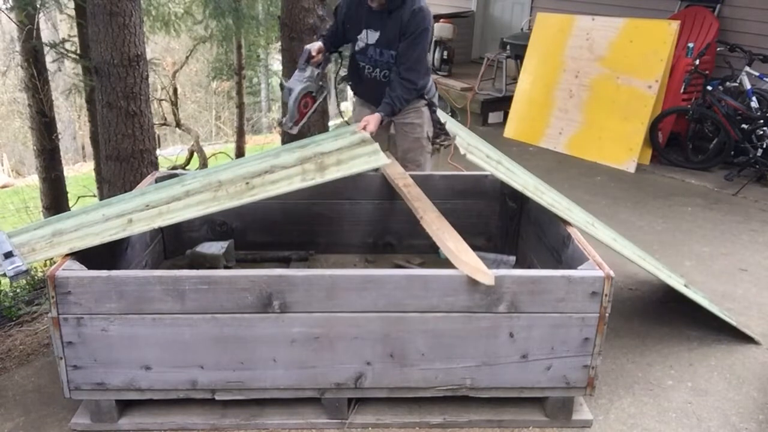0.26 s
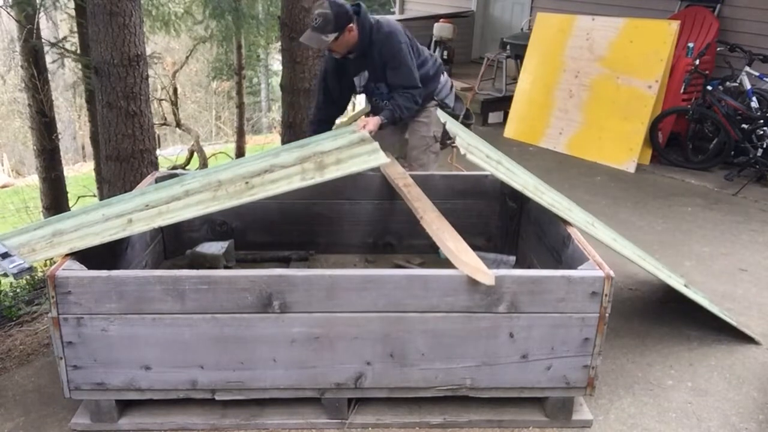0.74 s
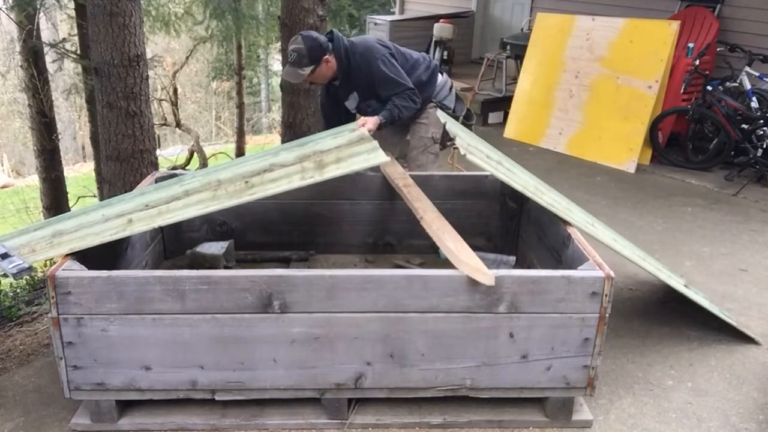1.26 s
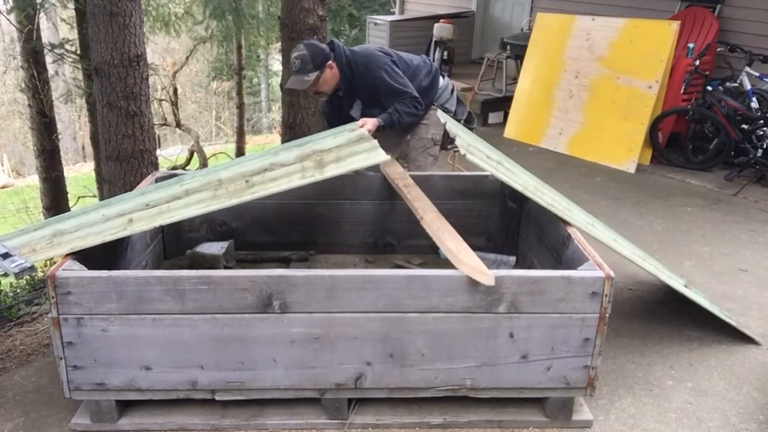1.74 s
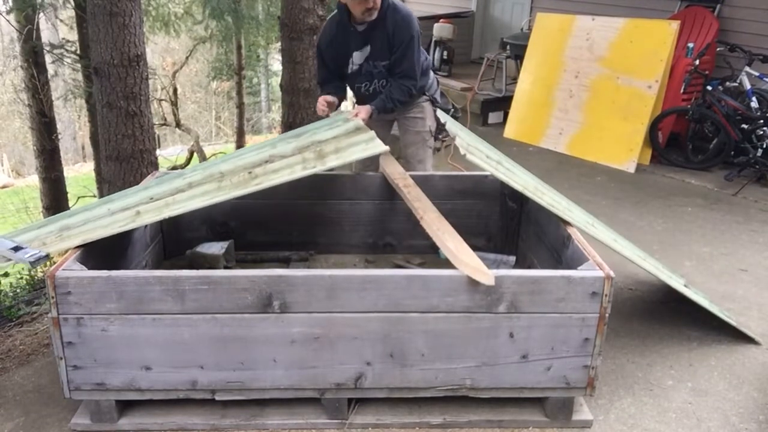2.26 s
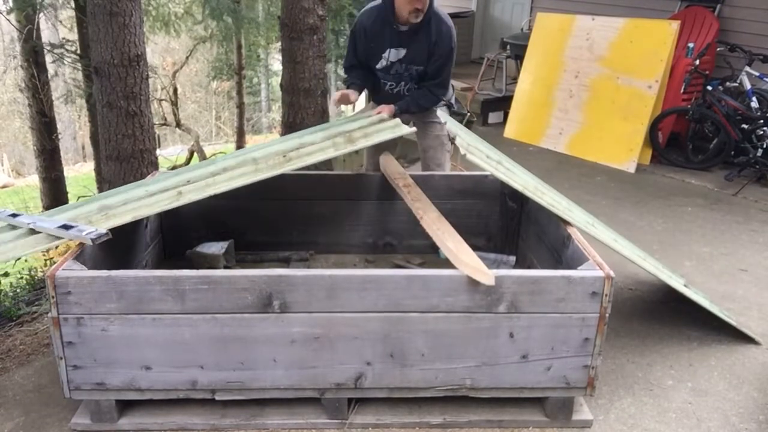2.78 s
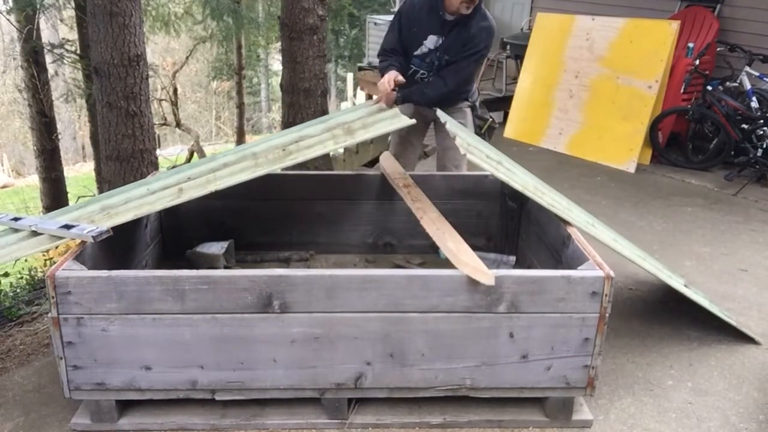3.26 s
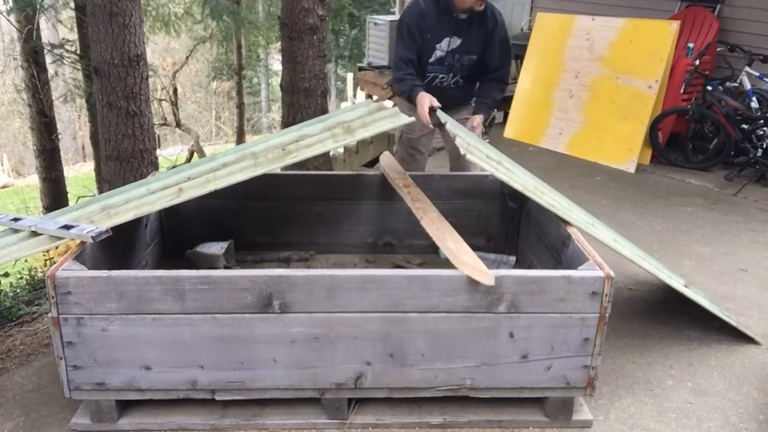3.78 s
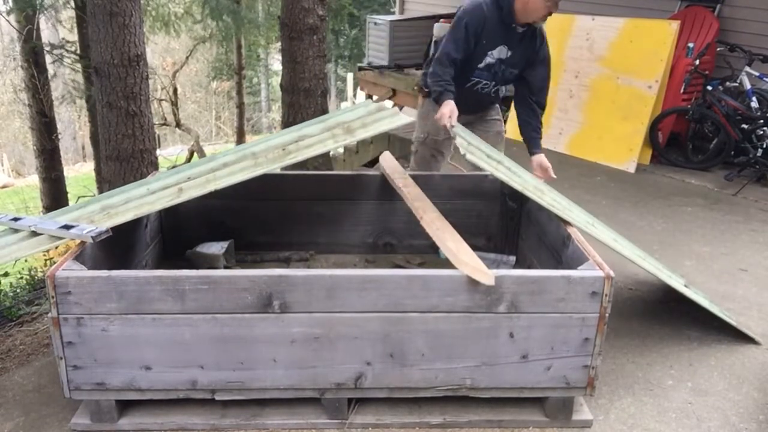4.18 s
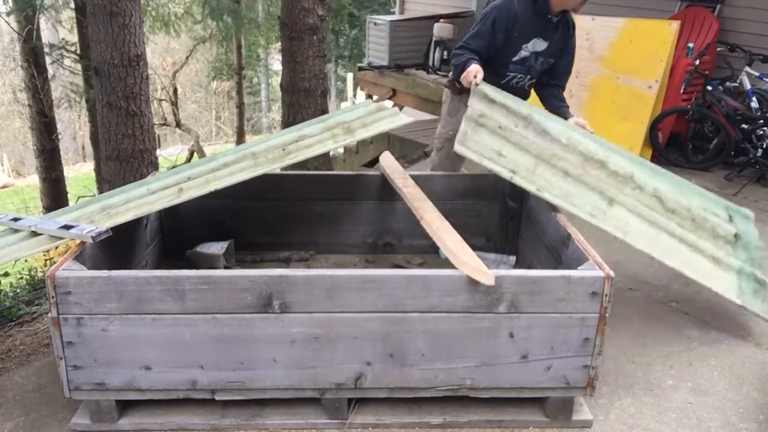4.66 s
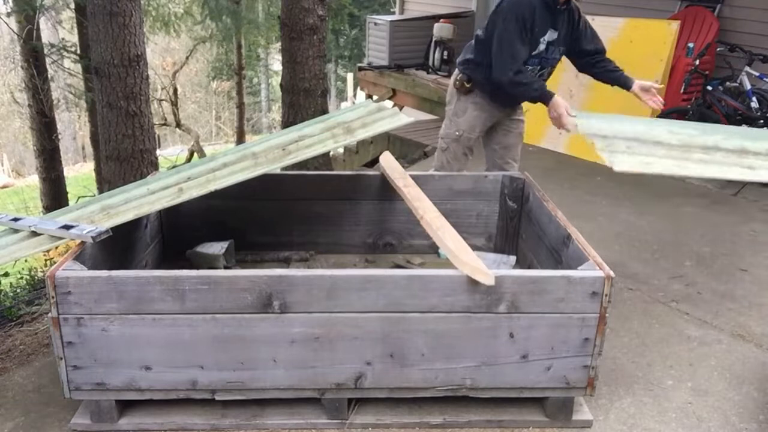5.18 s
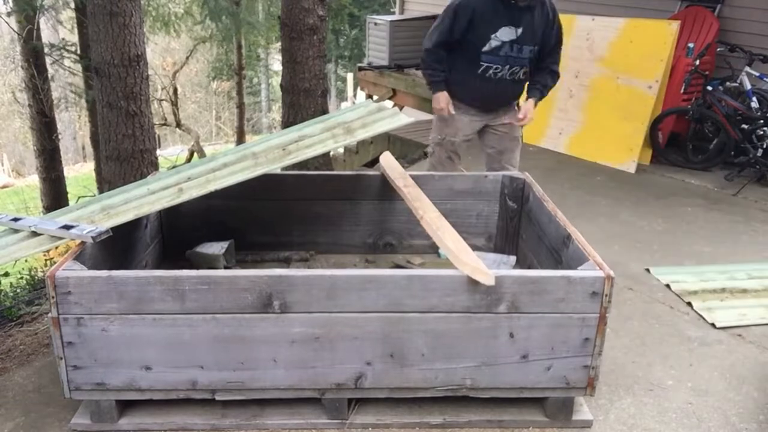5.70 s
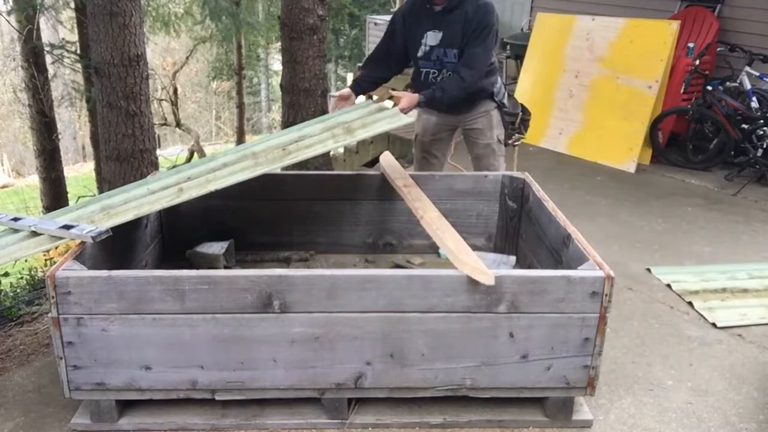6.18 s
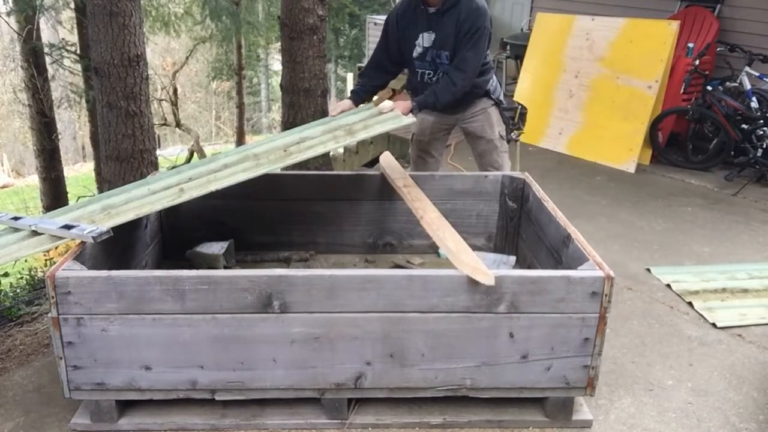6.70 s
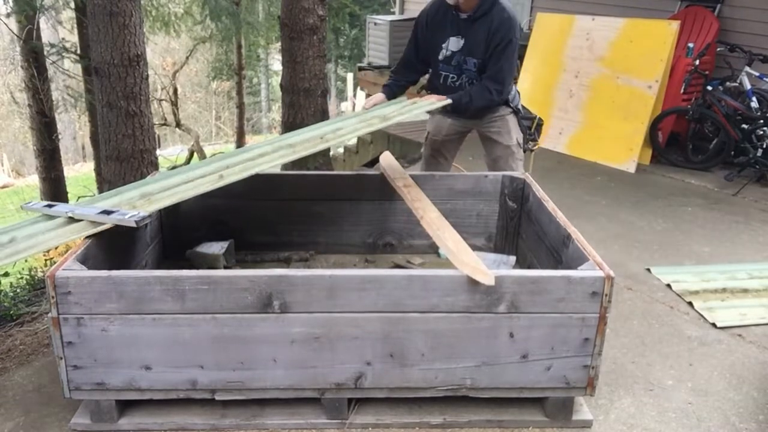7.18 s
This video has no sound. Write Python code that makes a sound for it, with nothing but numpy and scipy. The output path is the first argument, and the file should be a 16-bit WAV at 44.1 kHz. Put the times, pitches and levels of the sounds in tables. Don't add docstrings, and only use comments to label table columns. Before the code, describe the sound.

A quiet outdoor yard with faint air noise and low wind buffets on the microphone, strongest at the start. At 0 s a corrugated metal offcut lands with a clang, bounces at 0.1 and skids with a dry hiss, its ring fading over about a second. From 1.2 s a saw touches down lightly, knocks at 1.5 and thumps hardest at 1.8, with small clinks and rocking until 2.1. Tiny high birds peep; a clearer trill comes at 2.0, others near 4.0-4.3. From 2.3 to 3.1 s a sheet drags over crate wood with booming flex and a cluster of hollow bangs. A lull follows; at 4.2-4.6 a sheet edge scrapes concrete and jerks free, ringing thinly, with a slight touch at 5.2. At 5.56-5.75 the thrown sheet slams flat in a very loud, overloaded clattering crash, ringing over a second. Gritty scrapes resume from 6.7, growing to the end.

```python
import sys
import numpy as np
from scipy import signal
from scipy.fft import rfft, irfft
from scipy.io import wavfile
from scipy.ndimage import uniform_filter1d

SR = 44100
rng = np.random.default_rng(int(sys.argv[2]) if len(sys.argv) > 2 else 0)


def unload_wav(signal):
    wavfile.write(
        sys.argv[1],
        SR,
        np.round(np.clip(np.atleast_2d(signal).T, -1, 1) * 32767).astype(np.int16),
    )


def volts_from_decibels(level):
    exponent = np.asarray(level, float) / 20
    return 10 ** exponent


N = 328545


def evened(x):
    return x / np.sqrt(np.mean(x ** 2) + 1e-20)


def read(points, hz):
    f, value = np.transpose(points)
    return np.interp(np.log(hz + 1), np.log(f + 1), value)


def add(mix, s, sound):
    part = mix[round(s * SR):][:len(sound)]
    part += sound[:len(part)]


def placed(events):
    layer = np.zeros(N)
    for s, sound in events:
        add(layer, s, sound)
    return layer


def curves(rows):
    s, *columns = np.transpose(rows)
    t = np.arange(s[0], s[-1], 1 / SR)
    return s[0], t, [np.interp(t, s, c) for c in columns]


def coloured(x, spectrum, lo_hz=1, hi_hz=20000, order=6):
    hz = np.fft.rfftfreq(len(x), 1 / SR) + 1e-3
    band = 1 / np.sqrt((1 + (lo_hz / hz) ** 6) * (1 + (hz / hi_hz) ** order))
    return evened(irfft(rfft(x) * volts_from_decibels(read(spectrum, hz)) * band, len(x)))


def resonate(x, hz, width_hz):
    return signal.lfilter(*signal.iirpeak(hz, hz / width_hz, SR), x)


# frequency in Hz, level in dB per Hz.
AIR_SPECTRUM = [(88, -31.5), (150, -2), (366, -13), (499, -15), (1290, -23), (2600, -28.5), (3030, -25.5),
                (4220, -32), (14000, -38), (15500, -42)]
AIR_DB = -56.5


def air():
    return volts_from_decibels(AIR_DB - 2.5) * coloured(rng.standard_normal(N), AIR_SPECTRUM, 0.57, 14000)


# peak in seconds, level in dB, time to fall 20
# dB in seconds.
GUST_PUFFS = [(.02, -27, 0.4), (.15, -25.5, 0.25), (.31, -35, 0.28), (.55, -46, 1.1), (1.0, -37.5, .14),
              (1.2, -40, 0.1), (1.48, -40, 0.05), (1.58, -38, 0.67), (1.8, -35, 0.34), (2.05, -42, 0.7),
              (2.7, -41.5, 0.3), (2.9, -38.5, 0.65), (3.12, -40.5, 0.56), (3.5, -46, .6), (3.78, -42, 0.14),
              (3.9, -40.5, 0.16), (4.04, -40.5, .14), (4.36, -39, 0.13), (4.58, -44, 0.37),
              (4.899, -38.5, 0.03), (5.33, -48, 0.2), (5.62, -23.5, 0.09), (5.85, -35.5, 0.2),
              (6.06, -35.5, 0.1), (6.29, -41, 0.1), (6.5, -41.5, 0.2), (6.78, -43.5, 0.16),
              (6.92, -50, 0.5), (7.24, -44, .5)]
# frequency in Hz, level in dB per Hz.
WIND_SPECTRUM = [(12, -56), (20, -27), (40, -1), (76, 0), (280, -21.5), (321, -14.5), (398, -26.5),
                 (500, -34), (650, -76), (1100, -120)]
GUST_RISE, LULL_DB = .6, -71


def wind():
    lumps = evened(uniform_filter1d(uniform_filter1d(rng.standard_normal(N), 900), 900))
    t = np.arange(0, N / SR + .01, .005)
    puffs = []
    for s, db, fall_s in GUST_PUFFS:
        away_s = np.maximum(t - s, (s - t) / GUST_RISE)
        puffs.append(volts_from_decibels(db - 20 * away_s / fall_s))
    push = volts_from_decibels(LULL_DB) + np.max(puffs, axis=0)
    rumble = coloured(rng.standard_normal(N), WIND_SPECTRUM, 0.89, 400) * volts_from_decibels(2.5 * lumps)
    rumble = evened(rumble) * np.interp(np.arange(N) / SR, t, push)
    return signal.sosfilt(signal.butter(2, 48, "high", fs=SR, output="sos"), rumble)


# frequency in Hz, t60 in seconds.
SHEET_T60 = [(100, 1), (200, .75), (310, 1.44), (460, 0.98), (700, 1.154), (2050, 1.0), (2350, .9),
             (4000, 0.85), (6000, 0.56), (12000, 0.37)]


def dense_ring(spectrum, seconds, damping=1., late_db=-80, late_hz=9000):
    hz, t, z = signal.stft(rng.standard_normal(round(seconds * SR)), SR, nperseg=256)
    hz = hz[:, None]
    early = volts_from_decibels(-60 * t / (damping * read(SHEET_T60, hz)))
    late = volts_from_decibels(late_db - 60 * t / 1.36) / (1 + (hz / late_hz) ** 4)
    decaying = signal.istft(z * (early + late * (hz > 600)), SR, nperseg=256)[1]
    tail = coloured(decaying, spectrum)
    tail = tail * np.clip(np.linspace(5, -1, len(tail)), 0, 1)
    return tail / np.linalg.norm(tail)


def loose_ring(spectrum, peaks, damping, late_db, late_hz, modes_db):
    ring = dense_ring(spectrum, 1.6, damping, late_db, late_hz)
    t = np.arange(len(ring)) / SR
    modes = np.zeros(len(ring))
    for hz, db, t60 in peaks:
        modes += volts_from_decibels(db - 60 * t / min(t60, 1.1)) * np.sin(2 * np.pi * (hz * t + rng.random()))
    return ring + volts_from_decibels(modes_db) * modes / np.linalg.norm(modes)


# start in seconds, blow in dB, clatter in seconds, slap in dB, slap centre in Hz.
SHEET_LANDINGS = [
    (0, -19, 0.0032, 5.5, 1200),
    (.11, -27, 0.0056, -22, 700),
    (5.558, -21, 0.021, 10, 2400),
    (5.5788, -12.5, 0.012, 9, 2560),
    (5.6205, -12, 0.029, 12, 1040),
    (5.629, -30.5, 0.047, 22.5, 6140),
    (5.675, -15.5, 0.012, 8, 900),
    (5.69, -30, 0.072, 12, 3460),
    (5.745, -27.5, 0.068, -11.5, 1500),
]
# frequency in Hz, level in dB per Hz.
OFFCUT_SPECTRUM = [(35, -43), (60, -13), (91, -12), (142, -4.5), (359, -1), (520, -7.5), (720, -4),
                   (1050, -13), (1500, -9), (1910, -13), (2650, -21.5), (15500, -33.5)]
# frequency in Hz, level in dB, t60 in seconds.
OFFCUT_MODES = [(600, -4, 0.33), (765, -7.5, 0.74), (1047, -10, 0.44), (1130, -15, 0.64), (1280, -15, 0.76),
                (1520, -11.5, 0.61), (1720, -14, 0.42), (1964, -13, 1.8), (2400, -4, 0.15),
                (2466, -19.5, 0.72), (2770, -21, 0.65), (3230, -20, 1.3), (3330, -10, 0.26),
                (3500, -10.5, 0.36)]
# frequency in Hz, level in dB per Hz.
THROWN_SPECTRUM = [(35, -53.5), (60, -29.5), (200, -21), (340, -9), (497, -13), (558, -9), (737, -2.5),
                   (997, -9.5), (1150, -3), (2050, -8), (2650, -14.5), (5440, -18), (6100, -14.5),
                   (8070, -22), (15500, -16.5)]
# frequency in Hz, level in dB, t60 in seconds.
THROWN_PEAKS = [(572, -6, .9), (706, -2, .9), (764, -1, 1.0), (842, -3.5, 1.1), (886, -3, .8),
                (1124, 0, .9), (1288, -4, 1.0), (1480, -2, .9), (1575, -6.5, 0.62), (1733, -4.5, .85),
                (1940, -4, 1), (2050, -8, 1.0), (2520, -8.5, .7), (3300, -8.5, .7)]
CORNER_S = 5.56
CORNER_RISE_S, SLAP_RISE_S = .016, 0.002


def landings():
    out, t = np.zeros(N), np.arange(round(.7 * SR)) / SR
    offcut = loose_ring(OFFCUT_SPECTRUM, OFFCUT_MODES, damping=1.2, late_db=-17, late_hz=6900, modes_db=-24)
    thrown = loose_ring(THROWN_SPECTRUM, THROWN_PEAKS, damping=1.0, late_db=-19.5, late_hz=9000, modes_db=-6)
    for s, db, clatter_s, slap_db, hz in SHEET_LANDINGS:
        rise_s = CORNER_RISE_S if abs(s - CORNER_S) < .01 else SLAP_RISE_S
        envelope = np.exp(-t / clatter_s) * np.minimum(t / rise_s, 1)
        clatter = rng.standard_normal(len(t)) ** 3 * envelope
        slap = evened(resonate(rng.standard_normal(len(t)), hz, 0.12 * hz + 200)) * envelope
        ring = signal.fftconvolve(clatter / np.linalg.norm(clatter), offcut if s < 1 else thrown)
        add(out, s, volts_from_decibels(db + 37) * ring)
        add(out, s, volts_from_decibels(db + slap_db) * slap)
    return out


# start in seconds, hiss in dB, rise in seconds, t60 in seconds.
OFFCUT_SKIDS = [
    (.03, -36.5, .02, 0.33),
    (.2, -34.5, 0.013, 0.19),
    (.22, -42, .03, 1.2),
]
# frequency in Hz, level in dB per Hz.
CONCRETE_SPECTRUM = [(88, -40.5), (150, -10), (274, -13.5), (359, 4), (499, -2.5), (606, -2.5), (1570, -9),
                     (1980, -10.5), (2700, -16.5), (3210, -15), (4380, -18.5), (15500, -23)]


def skid():
    t = np.arange(SR) / SR
    push = np.zeros(SR)
    for s, db, rise_s, t60 in OFFCUT_SKIDS:
        push += volts_from_decibels(db - 60 * (t - s - rise_s) / t60) * np.clip((t - s) / rise_s, 0, 1) ** 2
    hiss = coloured(rng.standard_normal(len(t)), CONCRETE_SPECTRUM, 3600)
    return placed([(0, push * hiss * np.clip((1 - t) / 0.14, 0, 1))])


def bird(rows, warble_hz=0., per_s=36., far_db=0., hoarse=.3):
    s, t, (hz, db) = curves(rows)
    wander = uniform_filter1d(rng.standard_normal(len(t)), 1500)
    turns = np.cumsum(per_s * (1 + 4.0 * wander)) / SR
    hz = hz + warble_hz * signal.sawtooth(2 * np.pi * turns, .25)
    tone = np.sin(2 * np.pi * np.cumsum(hz) / SR)
    song = np.sqrt(2) * volts_from_decibels(db) * tone * signal.windows.tukey(len(t), .2)
    roughness = evened(uniform_filter1d(rng.standard_normal(len(t)), 60))
    song = song * (1 + .002 * warble_hz * np.sin(2 * np.pi * turns)) * (1 + hoarse * roughness)
    out = np.zeros(len(t) + SR // 10)
    for delay_s, echo_db in [(0, -0.5), (.011, -18), (.023, -7), (.045, -8.5)]:
        add(out, delay_s, volts_from_decibels(echo_db + far_db * (delay_s > 0)) * song)
    return s, out


# start in seconds, whole figure in seconds, share sung, level in dB.
SWOOP_CALLS = [(.866, .062, .6, -67), (1.12, 0.073, 0.87, -67), (1.272, .07, 1, -64),
               (3.29, .045, .45, -70), (3.33, .04, .9, -71), (3.385, .06, .55, -72), (3.51, .055, .6, -72),
               (3.82, .04, .7, -72), (6.104, .05, .4, -68), (6.262, .055, 0.72, -69.5),
               (6.698, .095, 1, -65)]
# share of the figure, pitch in Hz.
SWOOP_FIGURE = [(0, 8750), (.28, 8060), (.5, 7450), (.64, 8050), (1, 7500)]


def swoop(s, length_s, sung, db):
    u = sung * np.linspace(0, 1, 12)
    hz = np.interp(u, *np.transpose(SWOOP_FIGURE))
    return np.transpose([s + length_s * u, hz, db - 8 * np.exp(-u / .2)])


def swoops():
    return placed(bird(swoop(*row), far_db=-5) for row in SWOOP_CALLS)


def call(row, rise, fall, ends_db):
    s, length_s, first_hz, last_hz, db = row
    u = np.array([0, rise, 1 - fall, 1])
    hz = first_hz + (last_hz - first_hz) * u
    return np.transpose([s + length_s * u, hz, db + ends_db * np.array([1, 0, 0, 1])])


# start in seconds, length in seconds, first pitch in Hz, last pitch in Hz, level in dB.
BLIP_CALLS = [(1.072, .014, 8200, 8200, -64), (1.172, .03, 8400, 8900, -64),
              (1.305, 0.032, 8700, 8400, -67), (2.21, .025, 8500, 8200, -64), (3.93, .025, 8700, 8600, -64),
              (3.965, .012, 8800, 8200, -57), (4.86, 0.046, 8150, 8180, -65),
              (5.11, 0.046, 8300, 8500, -64), (3.335, .045, 9000, 8950, -68), (6.5, .016, 8470, 8450, -66)]


def blips():
    return placed(bird(call(row, rise=0.37, fall=0.44, ends_db=-9), far_db=-5) for row in BLIP_CALLS)


MIDDLING_DB, DULLEST_DB = -42.5, -36.5


def stroke(row, release):
    s, length_s, first_db, last_db, bright_db = row
    ring_s, fade, steepen, dull, boom_db, stiff = release
    u = ring_s * np.linspace(0, 1, 8)
    force_db = np.append(first_db, last_db - fade * u - steepen * u ** 2)
    bright = np.maximum(bright_db - dull * np.append(0, u), DULLEST_DB)
    boom = boom_db - stiff * (force_db - MIDDLING_DB)
    return np.transpose([np.append(s, s + length_s + u), force_db, boom, bright])


def rubbed(rows, ring, spectrum, booms, hiss, per_s, uneven_db, lo_hz=500, struck=None, order=6):
    s, t, (force_db, boom_db, bright_db) = curves(rows)
    size = volts_from_decibels(uneven_db * np.minimum(rng.exponential(1, len(t) + len(ring)), 3))
    grit = size * rng.standard_normal(len(size)) * (rng.random(len(size)) < per_s / SR)
    metal = signal.fftconvolve(grit, ring, "valid")[:len(t)]
    grit = grit[-len(t):]
    metal = evened(metal) + hiss * coloured(grit, spectrum)
    if struck is not None:
        modes = evened(signal.fftconvolve(grit, struck)[:len(t)])
        metal = metal + 0.6 * modes * np.exp(-(t - s) / 0.11)
    flat = [(1, 0), (20000, 0)]
    boom = np.zeros(len(t))
    for hz, width_hz, db in booms:
        boom += volts_from_decibels(db) * resonate(resonate(grit, hz, width_hz * 1.5), hz, width_hz * 1.5)
    body = coloured(metal, flat, lo_hz, 2120, order=order)
    low = volts_from_decibels(boom_db) * coloured(boom, flat, 1, 377)
    upper = volts_from_decibels(0.3 * bright_db - 9) * coloured(metal, flat, 2250, 4040, order=order)
    treble = volts_from_decibels(bright_db) * coloured(metal, [(5000, 1.5), (9000, -0.4), (14000, 3.5)], 4400)
    edge = np.clip(np.minimum(t - s, t[-1] - t) / .0015, 0, 1)
    return s, volts_from_decibels(force_db - 2.0) * (body + low + upper + treble) * edge


def concrete_ring():
    return dense_ring(CONCRETE_SPECTRUM, .3, damping=0.24)


def saw_ring(peaks):
    t = np.arange(round(.1 * SR)) / SR
    return sum(volts_from_decibels(.5 * db - 60 * t / .022) * np.sin(2 * np.pi * hz * t) for hz, db in peaks)


# start in seconds, length in seconds, first force in dB, last force in dB,
# grit brightness in dB.
SAW_TOUCHES = [
    (1.182, .008, -55, -48.5, 1),
    (1.364, 0.022, -55.5, -57, 3.5),
    (1.475, 0.027, -40.5, -43, 1.5),
    (1.79, .034, -31.5, -37, -7),
]
# frequency in Hz, level in dB.
SAW_TOUCH_MODES = [
    [(1170, 0), (3050, -2), (6160, -7), (8600, -18)],
    [(4600, -4), (5610, -9), (7070, -8), (8560, -10), (11300, -17)],
    [(1776, 2), (2450, 13), (4190, 0), (5470, -7), (6760, -9), (8360, -19)],
    [(1740, -6), (2985, 2), (3510, 1), (4050, -1), (8200, -23)],
]
# frequency in Hz, width in Hz, level in dB.
FLEX_BOOMS = [(313, 73, 2.5), (213.2, 180, 0.5), (378, 110, -2)]
# ring in seconds, fade in dB/s, steepening in dB/s2, dulling in dB/s, boom in dB at
SAW_TOUCH_RELEASE = (0.5, 148, 5, 3, -4.5, 0.07)


def saw_contacts():
    ring = concrete_ring()
    events = []
    for row, peaks in zip(SAW_TOUCHES, SAW_TOUCH_MODES):
        events.append(rubbed(stroke(row, SAW_TOUCH_RELEASE), ring, CONCRETE_SPECTRUM, FLEX_BOOMS[:2], hiss=0.3,
                             per_s=2300, uneven_db=3.5, lo_hz=900, struck=saw_ring(peaks)))
    return placed(events)


# start in seconds, blow in dB, wooden thud in dB,
# brightness in dB, t60 in seconds.
METAL_KNOCKS = [(1.184, -42, -2, 0, 0.12), (1.475, -34, -9, 1, 0.073), (1.793, -17, -32, -20, 0.16),
                (1.867, -27.5, -4, -11.5, 0.11), (1.777, -39, -20, -10, .1), (2.045, -47, -20, 4, .15),
                (2.219, -50, -20, 1, .08), (2.566, -27, -10, -10, 0.14), (2.644, -18, -0.5, -8, 0.081),
                (2.764, -23, 1.5, -23.5, 0.17), (2.859, -25, 1.5, -14, 0.2), (2.938, -32.5, -10, 0, 0.32),
                (2.97, -18.5, -7, -22, 0.13), (3.017, -20.5, -10, -22, 0.088), (3.091, -22, -7, 0, 0.13),
                (3.621, -44.5, 7, 2.5, 0.15), (4.236, -39, -12, 4, 0.15), (4.43, -35, -29, 2, 0.081),
                (4.578, -26.5, -14, 1, 0.11), (5.169, -42, -21.5, -26.5, 0.084),
                (6.676, -56.5, 0, 3.5, 0.095), (6.825, -47, -15.5, 1.5, 0.086),
                (6.845, -35.5, -0.5, 4, 0.15)]
# frequency in Hz, level in dB per Hz.
WOOD_SPECTRUM = [(88, -53), (150, -9), (332, -7.5), (509, -9.5), (765, -13), (1980, -19.5), (3280, -26),
                 (6340, -26), (7690, -30.5), (13800, -33.5), (15500, -41.5)]


def knock(s, db, thud_db, bright_db, t60):
    t = np.arange(round(.4 * SR)) / SR
    noise = rng.standard_normal(len(t))
    mid = coloured(noise, WOOD_SPECTRUM, 710, 5400) * volts_from_decibels(-60 * t / t60)
    top = coloured(noise, WOOD_SPECTRUM, 2700) * volts_from_decibels(bright_db - 60 * t / (0.52 * t60))
    low = coloured(noise, WOOD_SPECTRUM, 170, 360) * volts_from_decibels(thud_db + 8.5 - 60 * t / t60)
    low = low * np.minimum(t / 0.02, 1)
    return s, volts_from_decibels(db - 9) * (mid + top + low) * np.minimum(t / .0012, 1)


# time in seconds, level in dB, frequency in Hz, length in seconds.
CRATE_THUDS = [
    (1.469, -15, 290, 0.015),
    (1.794, -17.5, 344, 0.014),
    (1.857, -18.5, 354, 0.016),
    (2.04, -31, 353, 0.014),
    (2.744, -21, 346, 0.045),
    (3.069, -28, 183, 0.021),
    (5.567, -19, 291, 0.029),
]


def thud(s, db, hz, length_s):
    t = np.arange(round(length_s * SR)) / SR
    tone = np.sin(2 * np.pi * hz * t) + 0.63 * np.sin(2 * np.pi * 0.507 * hz * t)
    return s - .002, volts_from_decibels(db - 3) * tone * signal.windows.tukey(len(t), .7)


def rattle(s, db, hz, t60, width_hz=160):
    t = np.arange(SR) / SR
    buzz = evened(resonate(rng.standard_normal(len(t)), hz, width_hz))
    return s, volts_from_decibels(db - 4.0 - 60 * t / t60) * buzz * np.minimum(t / 0.0032, 1) * (1 - t)


# start in seconds, level in dB, frequency in Hz, t60 in seconds.
LASTING_HUMS = [(4.6, -42, 710, 0.82), (4.6, -43, 440, 1.1), (4.6, -46, 1500, 0.73), (4.6, -41, 3340, 0.56),
                (4.62, -48, 3940, 0.55), (5.17, -47, 931, .4), (5.17, -44, 1390, .4), (5.565, -23, 400, .3),
                (5.62, -25, 310, 1.5), (5.63, -18, 580, 1.2), (5.65, -17, 740, .6), (5.63, -20, 1480, 1.1),
                (5.63, -19, 1130, 1.1), (4.7, -46, 560, 1.2), (4.72, -48, 1900, .9), (5.17, -50, 1650, .7),
                (5.17, -50, 580, .9), (5.2, -55, 3200, .5), (5.57, -18, 1500, .2), (5.63, -24, 1950, .8),
                (5.68, -25, 3340, .7), (5.77, -26, 1800, .6), (5.78, -32, 3550, .4), (1.477, -40, 5400, .3),
                (1.477, -49, 6750, .15), (1.59, -54, 6600, .15), (1.59, -44, 1900, 0.18),
                (6.45, -64.5, 5600, .12), (6.823, -49, 6540, .1), (6.846, -43, 6440, .08)]


def hums():
    return placed(rattle(*row, width_hz=90) for row in LASTING_HUMS)


# start in seconds, level in dB, frequency in Hz, t60 in seconds.
GUARD_CLINKS = [
    (1.485, -35.5, 1600, 0.091),
    (1.5686, -34.5, 1136, 0.057),
    (1.673, -41, 1130, 0.05),
    (1.709, -42, 1150, 0.078),
    (1.8678, -36.5, 1740, 0.17),
    (1.9779, -39.5, 1620, 0.064),
    (2.046, -43, 980, 0.15),
]


def clink(s, db, hz, t60, pair=1.3):
    t = np.arange(round(.3 * SR)) / SR
    tone = np.sin(2 * np.pi * hz * t) + 0.4 * np.sin(2 * np.pi * hz * pair * t)
    return s, volts_from_decibels(db + 2 - 60 * t / t60) * tone * np.minimum(t / 0.00075, 1)


# start in seconds, level in dB, frequency in Hz, t60 in seconds.
LOOSE_PARTS = [(1.625, -50, 5300, 0.29), (1.625, -48, 3980, .15), (1.705, -44, 1790, 0.22),
               (1.705, -54, 5600, .25), (1.705, -51, 4660, 0.17), (1.87, -42, 4150, .25),
               (1.98, -45, 2980, 0.11), (2.04, -44, 680, 0.69), (3.34, -51.5, 3900, 0.3),
               (3.555, -51.5, 2400, .1), (5.17, -51, 3200, 0.6), (4.599, -35, 1970, 0.65),
               (5.17, -47, 1930, 1)]


def loose_parts():
    return placed(rattle(*row) for row in LOOSE_PARTS)


# start in seconds, length in seconds, first force in dB, last force in dB,
# grit brightness in dB.
SAW_ROCKS = [
    (1.63, 0.11, -58.5, -52, -5),
    (1.865, 0.017, -48, -46, -1),
    (1.97, 0.13, -50.5, -50.5, -11),
]
# ring in seconds, fade in dB/s, steepening in dB/s2, dulling in dB/s, boom in dB at
SAW_ROCK_RELEASE = (.25, 90, 60, 5, 6.7, .05)


def saw_rocking():
    ring = concrete_ring()
    return placed(rubbed(stroke(row, SAW_ROCK_RELEASE), ring, CONCRETE_SPECTRUM, FLEX_BOOMS[:2], hiss=0.4,
                         per_s=1800, uneven_db=3.5, lo_hz=900) for row in SAW_ROCKS)


# start in seconds, length in seconds, first pitch in Hz, last pitch in Hz, level in dB.
TRILL_CALLS = [
    (1.975, 0.22, 8070, 7950, -47.5),
    (3.965, 0.25, 8210, 7950, -52.5),
    (4.212, .14, 8200, 7900, -51.5),
]


def trills():
    return placed(bird(call(row, rise=.1, fall=.45, ends_db=-14), warble_hz=150., per_s=38., hoarse=.2)
                  for row in TRILL_CALLS)


# start in seconds, length in seconds, first force in dB, last force in dB,
# grit brightness in dB.
WOOD_STROKES = [
    (2.26, 0.12, -64.5, -44, -2),
    (2.38, 0.16, -48.5, -40, -3.5),
    (2.54, 0.13, -40, -33, -10),
    (2.74, 0.25, -39, -38.5, -13),
    (2.965, 0.15, -38.5, -31.5, -4),
]
# ring in seconds, fade in dB/s, steepening in dB/s2, dulling in dB/s, boom in dB at
WOOD_LET_GO = (.7, 40.8, 60, 143, 4, 0.47)


def drags_over_wood():
    ring = dense_ring(WOOD_SPECTRUM, .3, damping=0.2)
    return placed(rubbed(stroke(row, WOOD_LET_GO), ring, WOOD_SPECTRUM, FLEX_BOOMS, hiss=1.45,
                         per_s=4500, uneven_db=1.5) for row in WOOD_STROKES)


# start in seconds, length in seconds, first force in dB, last force in dB,
# grit brightness in dB.
CONCRETE_STROKES = [
    (4.228, .13, -47.5, -47, 4),
    (4.428, .11, -42, -40, 1.5),
    (4.54, 0.063, -41, -32.5, -1),
    (4.995, 0.13, -58.5, -60, 0.5),
    (5.16, .012, -47.5, -42, -13),
    (6.73, .12, -72.5, -49, 3.5),
    (6.87, .06, -50, -43, -4),
    (6.94, 0.31, -46, -47, -1),
    (7.24, .15, -49.5, -43, 3),
    (7.39, .06, -46, -35.5, -3),
]
# ring in seconds, fade in dB/s, steepening in dB/s2, dulling in dB/s, boom in dB at
CONCRETE_LET_GO = (0.8, 62, 5, 175, -7.5, 0.3937)


def drags_over_concrete():
    ring = concrete_ring()
    return placed(rubbed(stroke(row, CONCRETE_LET_GO), ring, CONCRETE_SPECTRUM, FLEX_BOOMS, hiss=3.1,
                         per_s=12000, uneven_db=1.5, order=16) for row in CONCRETE_STROKES)


def scene():
    yard = air() + wind()
    birds = swoops() + blips() + trills()
    saw = saw_contacts() + saw_rocking() + placed(clink(*row) for row in GUARD_CLINKS)
    blows = placed(knock(*row) for row in METAL_KNOCKS) + placed(thud(*row) for row in CRATE_THUDS)
    sheets = landings() + skid() + drags_over_wood() + drags_over_concrete()
    ringing = hums() + loose_parts()
    return (yard + birds + saw + blows + sheets + ringing)[None]


def low_pass(x):
    return signal.sosfilt(signal.butter(12, 15610, fs=SR, output="sos"), x)


def record(dry):
    lowpass = signal.firwin(401, 15620, window=("kaiser", 8), fs=SR)
    limited = signal.oaconvolve(np.clip(dry, -1.1, 1.1), lowpass[None], "same")
    return low_pass(limited)


dry = scene()
out = record(dry)
unload_wav(out)
```